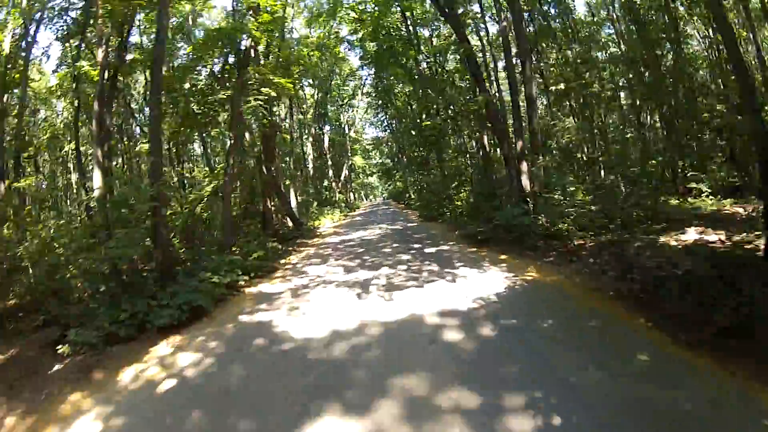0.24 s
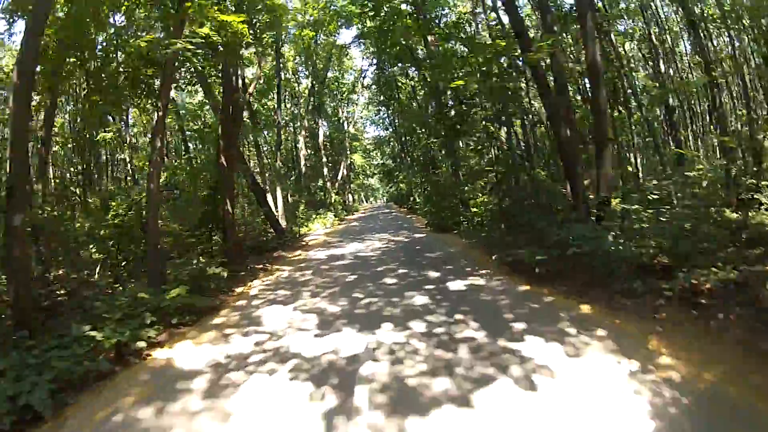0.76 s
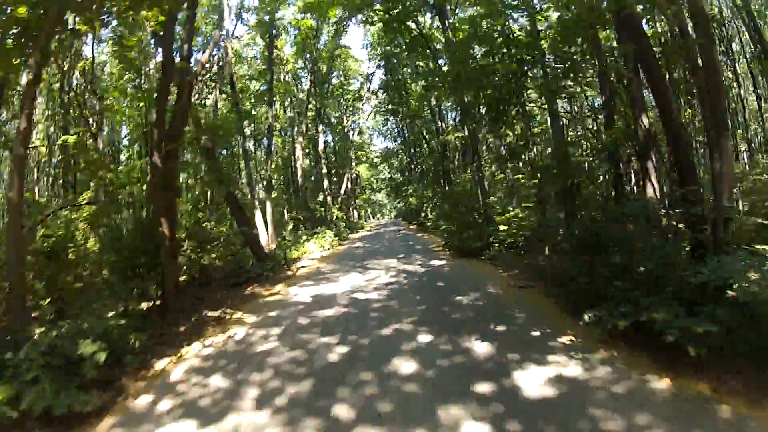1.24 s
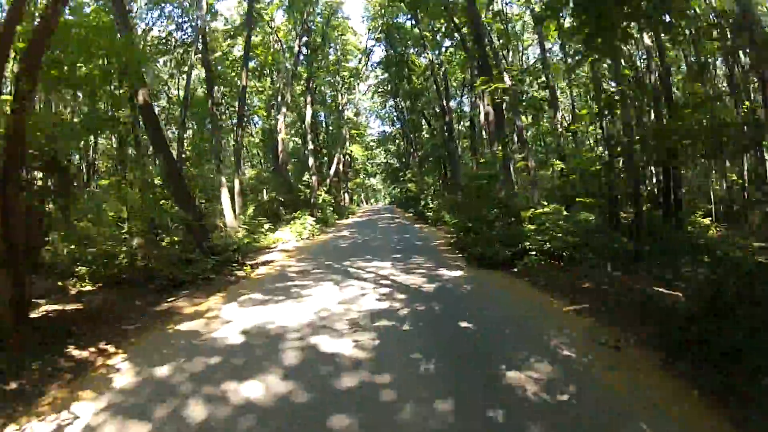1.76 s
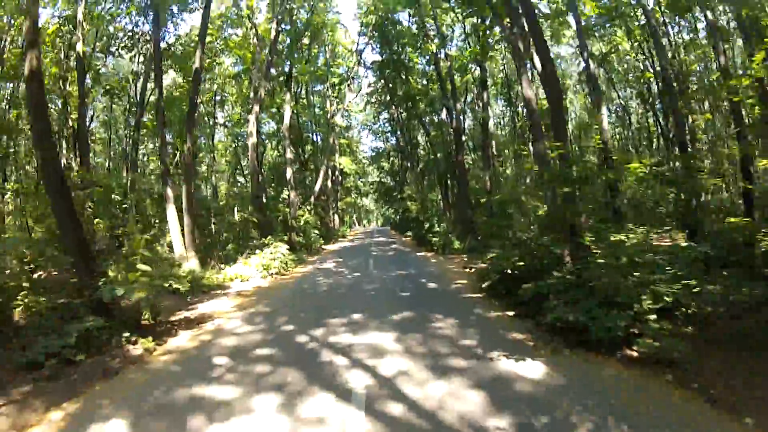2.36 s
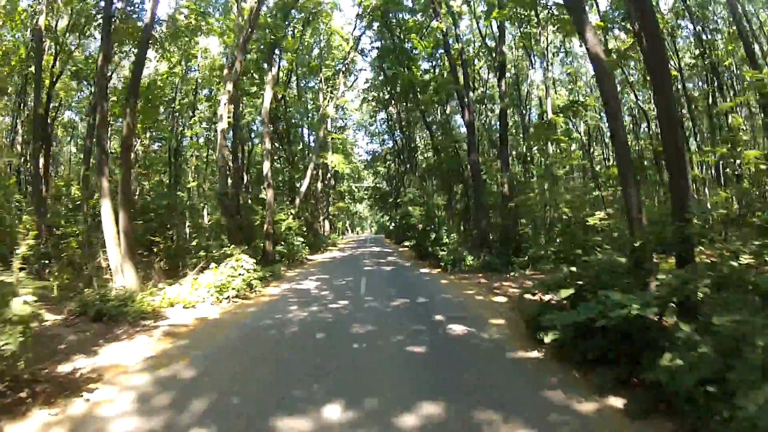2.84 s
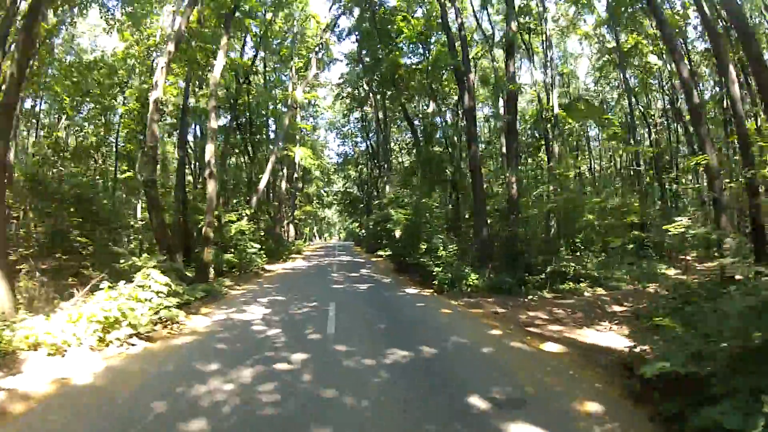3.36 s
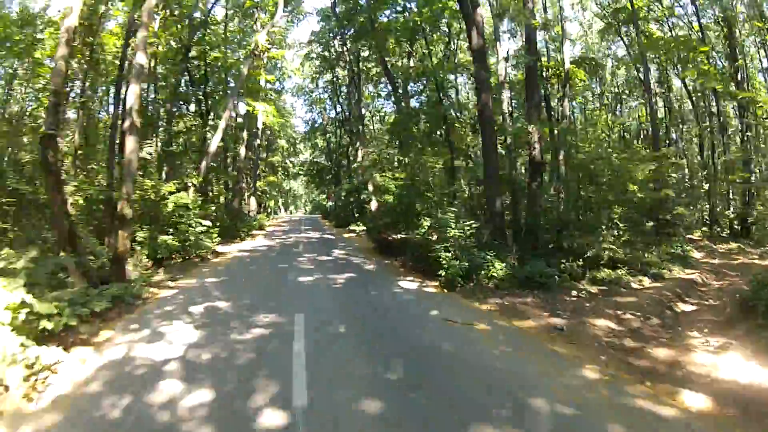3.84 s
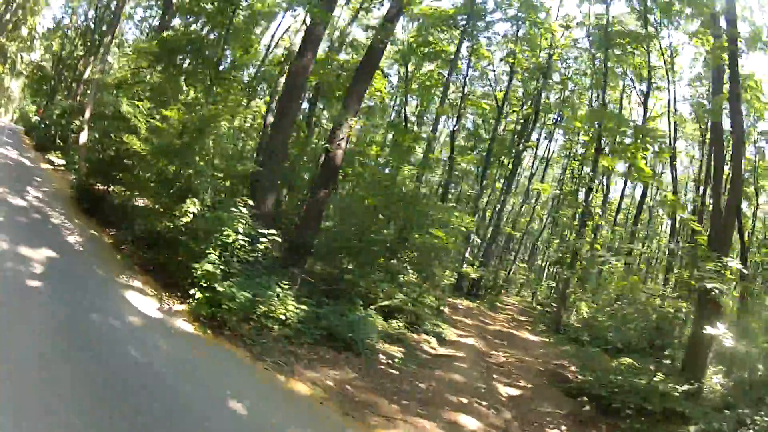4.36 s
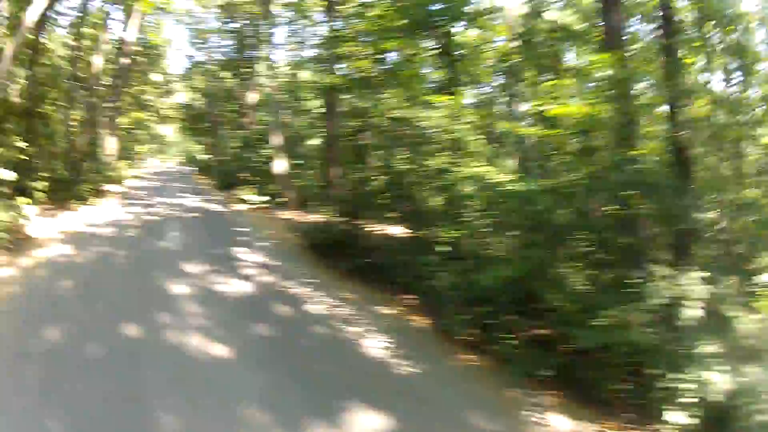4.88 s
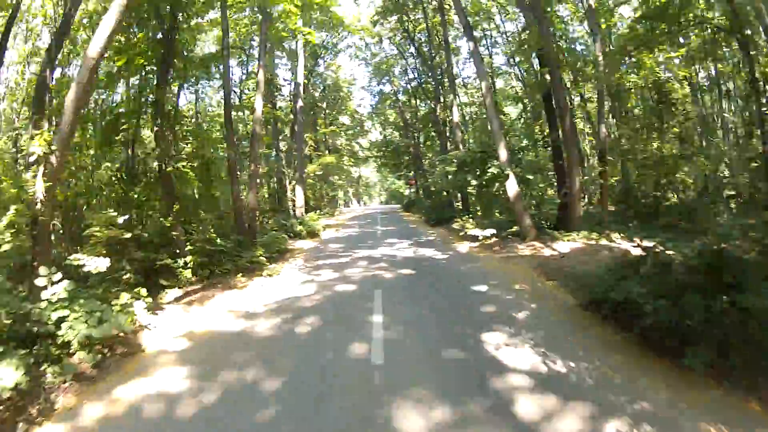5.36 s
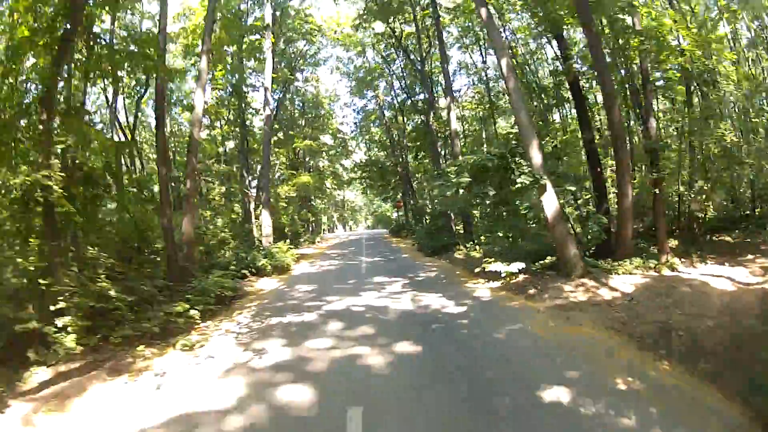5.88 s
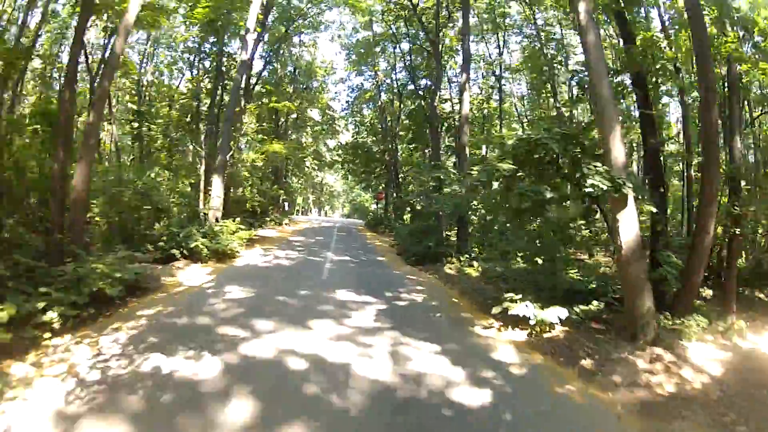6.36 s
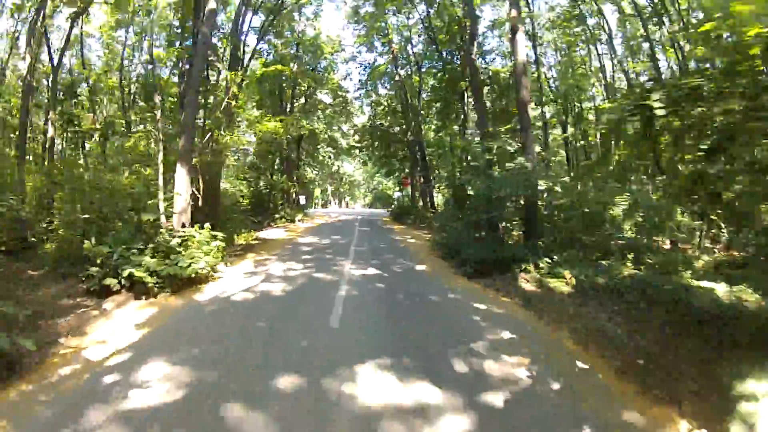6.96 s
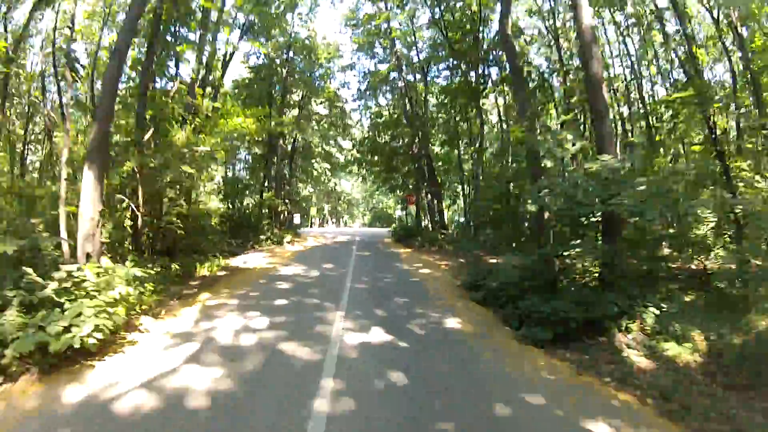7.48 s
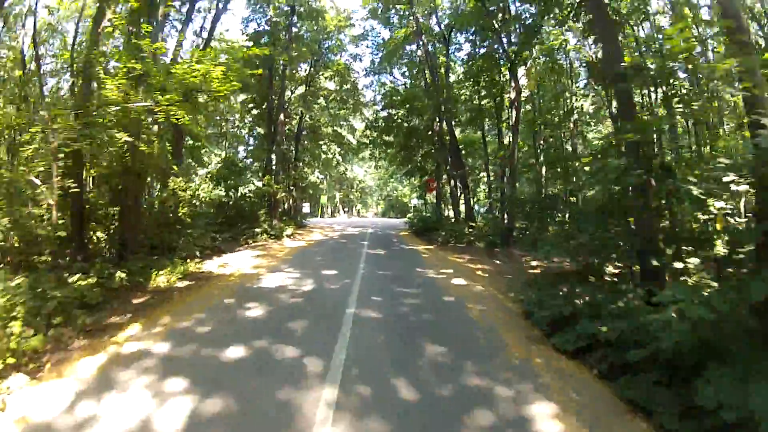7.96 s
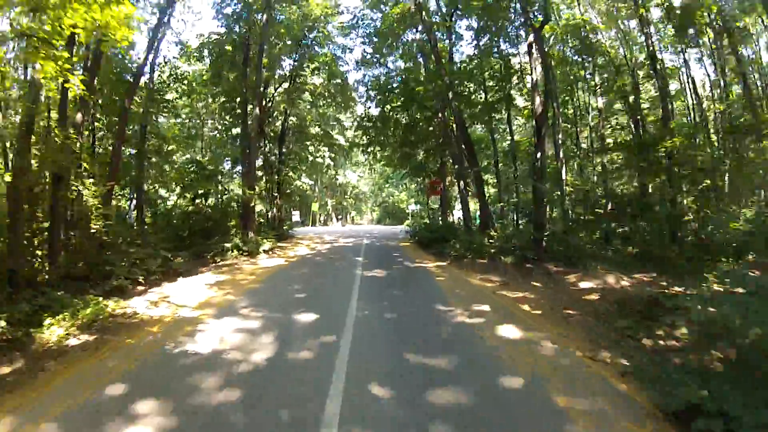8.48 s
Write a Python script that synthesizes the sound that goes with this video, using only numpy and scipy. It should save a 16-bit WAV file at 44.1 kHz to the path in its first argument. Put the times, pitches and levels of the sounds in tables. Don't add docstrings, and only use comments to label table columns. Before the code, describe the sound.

Close, boxy wind noise from a microphone sealed inside a plastic case on a cyclist's helmet. From 0 s a breathy, noisy whistle around 2-3 kHz flutters and swells, strong at 0.4-0.8 s and 2.4-2.9 s, over hollow rushing and irregular low thumps, heaviest at about 1.7, 2.9 and 3.6 s. Tyres hum and roar steadily on asphalt below, slightly rougher near 3.3 and 6.8 s. Faint falling chips and five quick bird phrases come in the first 1.8 s; clear chirps follow at 2.3 s, with a grit tick at 2.45 s. From 4 to 5 s the head turns aside: whistle and rush sink, leaving tyres, soft buffeting and a tick at 4.87 s. Wind returns with puffs at 5.0, 6.0 and strongest 6.7 s. Gusts and thuds continue to 8.7 s, with short bird whistles from 7.1 s, clearest at 7.7 s. A coarse, metallic, lo-fi edge colours the top.

```python
import sys
import numpy as np
from scipy import signal
from scipy.fft import rfft, irfft
from scipy.io import wavfile
from scipy.ndimage import uniform_filter1d

SR = 44100
rng = np.random.default_rng(int(sys.argv[2]) if len(sys.argv) > 2 else 0)


def waveform_to_disk(signal):
    frames = np.transpose(np.atleast_2d(signal))
    scaled = np.clip(frames, -1, 1) * 32767
    samples = np.round(scaled).astype(np.int16)
    wavfile.write(sys.argv[1], SR, samples)


def invert_db(x):
    u = np.asarray(x, float) / 20
    return 10 ** u


N = 384552

CHIP_START_S, CHIP_EVERY_S, CHIPS = 0.239, 0.132, 5
CHIP_DB, CHIP_GROWS_DB = -65, 0.4
# start in seconds, top in Hz, level in dB.
PHRASES = [
    (0.897, 4000, -55),
    (1.092, 3950, -52),
    (1.272, 4400, -53),
    (1.455, 4450, -55),
    (1.643, 4420, -54),
]
# start in seconds, length in seconds, first pitch in Hz, last pitch in Hz, level in dB.
WHISTLES = [(2.267, 0.054, 2850, 3360, -45.5), (2.311, .036, 3530, 3950, -48),
            (2.888, 0.044, 3490, 3450, -55), (3.092, .035, 4550, 4130, -64), (3.122, .035, 4150, 4100, -64),
            (3.238, 0.061, 3260, 3260, -61), (3.35, .02, 4150, 4100, -62), (7.128, .19, 1394, 1420, -51),
            (7.61, .08, 4440, 4320, -68), (7.8, 0.057, 4330, 4360, -70), (7.68, .04, 1870, 1900, -52),
            (7.712, .04, 2080, 2250, -40), (7.742, 0.052, 2190, 2044, -44),
            (7.984, 0.04, 3820, 3580, -53.5), (7.997, 0.018, 4120, 4200, -56),
            (8.022, .06, 1390, 1385, -53), (8.052, .035, 3750, 3450, -61), (8.107, 0.043, 1380, 1405, -46),
            (8.17, 0.052, 1400, 1370, -49), (8.294, 0.04, 3670, 3520, -56), (8.362, 0.03, 3450, 3100, -58),
            (8.548, 0.045, 3800, 2880, -58)]
# start in seconds, length in seconds, first pitch in Hz, last pitch in Hz, level in dB.
BUZZES = [(0.83, .06, 5100, 4970, -67), (1.252, .03, 4200, 4070, -62), (1.367, 0.011, 3900, 3730, -59),
          (2.255, .05, 3740, 3590, -64), (2.36, .04, 3740, 3740, -65), (2.45, .02, 3990, 3900, -48),
          (2.77, .04, 4190, 4200, -59), (3.373, .11, 3880, 3970, -64), (3.644, 0.052, 4500, 4450, -66),
          (5.529, 0.16, 4000, 4100, -64.5), (7.234, .25, 4050, 4010, -63.5), (7.31, 0.095, 3930, 3820, -65)]
CLEAR, BUZZY = 0.12, 0.42

# frequency in Hz, density in dB per Hz.
ROAD_SPECTRUM = [(41, -32), (70, -5.5), (93, -13), (222, -12), (294, -17), (396, -18), (543, -23.5),
                 (1040, -20.5), (1140, -17.5), (1480, -67), (1720, -24.5), (2600, -23.5), (3130, -56),
                 (3700, -54), (6000, -40.5), (7800, -78), (13200, -120)]
# frequency in Hz, width in Hz, level in dB.
TYRE_MODES = [(58.7, 21, 2), (192, 45, 0), (217, 63, -6)]
# middle in seconds, half length in seconds, level in dB.
PATCHES = [
    (3.3, 0.64, 1.5),
    (4.75, .2, 1),
    (5.4, .5, -0.5),
    (6.75, 0.46, 1.5),
]
HUM_DB, HUM_FADE_DB_PER_S, HUM_SHADED_DB = -55.5, 0.14, 3

# start in seconds, ring in Hz, width in Hz, peak in dB.
TICKS = [
    (4.867, 5500, 2600, -48),
    (4.869, 4750, 900, -51),
    (2.454, 4900, 2000, -45),
    (2.43, 5500, 1500, -54),
    (7.447, 3100, 900, -52),
    (5.019, 2300, 700, -37),
    (5.978, 2480, 600, -35),
    (6.68, 2500, 480, -29),
]

# frequency in Hz, width in Hz, level in dB.
CAVITY_MODES = [(2143, 137, 1), (2330, 238, -1.5), (2478, 112, 2.5), (2604, 137, 1.5), (2877, 139, -4.5)]
# frequency in Hz, width in Hz, level in dB.
WALL_MODES = [(755.5, 116, -4.5), (902, 112, -4.5), (967, 140, -12), (1219, 84, 0.5), (1350, 114, 2),
              (1624, 335, -3.5), (1852, 132, -0.5)]
# frequency in Hz, width in Hz, level in dB.
SHELL_MODES = [(3320, 320, -1.5), (3770, 320, -1.5), (3984, 320, -4), (4470, 170, -10.5), (4966, 600, -6),
               (5810, 280, -12)]
# frequency in Hz, density in dB per Hz.
BUFFET_SPECTRUM = [(4.7, -13), (8.0, 9), (21, -1.5), (59, -5), (95, -20.5), (140, -48), (240, -120)]
# time in seconds, level in dB.
FACING = [(0.0, -44.5), (0.4, -37), (0.75, -37.5), (1.0, -42), (1.75, -42.5), (2.4, -38.5), (2.88, -40),
          (3.2, -49), (3.75, -42), (3.93, -44.5), (4.02, -54), (4.45, -60), (4.96, -57), (5.3, -43.5),
          (5.95, -44), (6.35, -40.5), (6.85, -45.5), (7.15, -43)]
# middle in seconds, half length in seconds, level in dB.
GUSTS = [(0.21, 0.077, 3), (0.29, 0.083, -4), (0.55, 0.16, -2.5), (0.82, 0.063, -8), (1.14, .1, 0),
         (1.25, 0.047, 4), (1.42, 0.098, -4.5), (1.57, 0.053, 3), (1.77, 0.051, -3.5), (1.89, 0.14, 2),
         (2.655, 0.054, -9), (3.25, 0.037, -1), (3.35, 0.075, 2), (4.5, .06, -2), (5.04, 0.089, 3),
         (5.33, 0.055, 1), (5.4, 0.032, -7.5), (5.87, .12, -7), (6.08, 0.063, -7.5), (6.46, 0.031, 4.5),
         (6.7, 0.17, -1), (6.95, 0.069, 0), (7.1, 0.059, 4.5), (7.32, 0.038, 5.5), (7.5, 0.082, -4),
         (7.76, 0.037, 2), (7.88, 0.082, -0.5), (8.45, 0.057, -3.5), (8.54, .12, 1.5), (8.7, .12, -2)]
# time in seconds, level in dB.
RIM = [(0.0, -70.5), (0.3, -67.5), (1.2, -67), (2.3, -69), (3.25, -73.5), (3.85, -73), (4.45, -79),
       (4.85, -78.5), (5.4, -72), (6.2, -73), (6.7, -76), (7.85, -72), (8.72, -73.5)]
# time in seconds, share of the turn 0-1.
GLANCE = [
    (3.65, 0),
    (4.0, 0.45),
    (4.35, 1),
    (4.9, 0.84),
    (5.08, 0.3),
    (5.35, 0.1),
]
RUSH_DB, RUSH_FADE_DB_PER_S, RUSH_SHADED_DB = -47.5, 0.3, 9
# middle in seconds, half length in seconds, level in dB over the lull.
THUMPS = [(0.06, .1, -1), (0.24, 0.077, 8), (0.52, 0.19, 12), (0.72, .15, 7), (1.38, 0.13, 12),
          (1.66, 0.16, 18), (1.96, 0.18, 11), (2.19, .2, 13), (2.56, 0.11, 9), (2.73, 0.19, 14),
          (2.89, 0.15, 17.5), (3.25, 0.071, 7), (3.46, 0.1, 11), (3.64, 0.15, 16), (4.07, 0.34, 5),
          (4.45, .1, 6), (4.7, 0.25, 4.5), (5.03, 0.095, 13), (5.33, 0.23, 8), (5.62, .3, 8),
          (5.87, 0.11, 11), (6.1, 0.22, 8.5), (6.36, 0.075, 8), (6.52, 0.07, 4), (6.68, 0.33, 6),
          (7.15, 0.32, 11), (7.5, 0.17, 10), (7.68, 0.17, 16), (7.97, .15, 12.5), (8.28, 0.32, 14)]
LULL_DB, THUMP_SHARE = -53, 0.74
# time in seconds, peak in dB, push +1 or pull -1.
JOLTS = [(0.23, -36, 1), (0.527, -33.5, 1), (0.676, -37, -1), (1.377, -34.5, 1), (1.602, -34, -1),
         (1.699, -31, -1), (1.85, -42, -1), (1.95, -36, 1), (2.198, -32.5, -1), (2.29, -40, 1),
         (2.556, -36, -1), (2.746, -33, -1), (2.878, -29, 1), (3.414, -39, 1), (3.53, -38, -1),
         (3.639, -35, 1), (4.067, -37, 1), (4.209, -41, 1), (4.513, -43, -1), (5.293, -36, -1),
         (5.389, -37, -1), (5.87, -33.5, 1), (6.221, -37, 1), (6.358, -37, -1), (7.057, -36, -1),
         (7.16, -35, -1), (7.49, -33, 1), (7.653, -37, 1), (8.242, -35, 1), (8.382, -37, -1)]
JOLT_S, REBOUND_S, JOLT_DB = 0.0046, 0.032, 0.5
HUSH_S, HUSH_DB = 0.025, -14

CONVERTER_HZ, HOLD = 12000, 4


def rms_one(x):
    return x / np.sqrt(np.mean(x ** 2) + 1e-20)


def in_time(rows):
    s, *columns = np.transpose(rows)
    return [np.interp(np.arange(N) / SR, s, c) for c in columns]


def swells(rows):
    out, t = np.zeros(N), np.arange(N) / SR
    for s, length, level_db in rows:
        span = slice(max(round((s - length) * SR), 0), round((s + length) * SR))
        phase = np.clip((t[span] - s) / length, -1, 1)
        out[span] += level_db * np.cos(np.pi / 2 * phase) ** 2
    return out


def fading(start_db, db_per_s, shaded_db):
    return start_db - db_per_s * np.arange(N) / SR - shaded_db * in_time(GLANCE)[0]


def drift(rate):
    r = np.exp(-40 * np.pi * rate / SR)
    noise = rng.standard_normal(N // 20 + 2002)
    slow = signal.lfilter([1], [1, -2 * r, r * r], noise)[2000:]
    return np.interp(np.arange(N) / 20, np.arange(len(slow)), rms_one(slow))


def puffs(per_s, die_s):
    hits = (rng.random(N) < per_s / SR) * np.minimum(rng.exponential(1, N), 2.5)
    level = signal.lfilter([1], [1, -np.exp(-1 / (die_s * SR))], hits)
    level = uniform_filter1d(level, size=80)
    return rms_one(level - level.mean())


def coloured(spectrum):
    hz = np.arange(N // 2 + 1) * SR / N + 1
    corner_hz, corner_db = np.transpose(spectrum)
    level_db = np.interp(np.log(hz), np.log(corner_hz), corner_db)
    return rms_one(irfft(rfft(rng.standard_normal(N)) * invert_db(level_db), N))


def evened(x, window_s):
    power = uniform_filter1d(x ** 2, size=round(window_s * SR))
    return rms_one(x / np.sqrt(power + 0.1))


def resonate(x, hz, width_hz):
    r = np.exp(-np.pi * width_hz / SR)
    section = [(1 - r * r) / 2, 0, (r * r - 1) / 2, 1, -2 * r * np.cos(2 * np.pi * hz / SR), r * r]
    return signal.sosfilt([section, section], x)


def blown(modes, eddies, shared_db, own_db, own_rate):
    out = 0
    for hz, width_hz, level_db in modes:
        push = rng.standard_normal(N) * invert_db(shared_db * eddies + own_db * drift(own_rate))
        out = out + invert_db(level_db) * resonate(push, hz, 1.48 * width_hz)
    return rms_one(out)


def scatter(x, start_s, t60):
    age = np.arange(round(0.4 * SR)) / SR
    echoes = rng.standard_normal(len(age)) * invert_db(-60 * age / t60) * (age > start_s)
    return signal.fftconvolve(x, echoes / np.sqrt(np.sum(echoes ** 2)))[:N]


def songs():
    notes = []
    for k in range(CHIPS):
        s, level_db = CHIP_START_S + k * CHIP_EVERY_S, CHIP_DB + k * CHIP_GROWS_DB
        notes.append((s, 0.04, 6000, 5000, level_db, 0.3))
        notes.append((s + 0.04, 0.04, 5150, 5050, level_db - 1.5, 0.4))
    for s, top_hz, level_db in PHRASES:
        notes.append((s, 0.017, 3750, top_hz - 200, level_db + 1.5, 0.25))
        notes.append((s + 0.025, 0.045, top_hz, 3000, level_db - 1.0, 0.25))
        notes.append((s + 0.064, 0.035, 3050, 3100, level_db + 4.5, 0.45))
    return notes + [(*row, CLEAR) for row in WHISTLES] + [(*row, BUZZY) for row in BUZZES]


def birds():
    out, waver, flutter = np.zeros(N), drift(320), drift(200)
    for s, length, first_hz, last_hz, level_db, buzz in songs():
        span = slice(round(s * SR), round((s + length) * SR))
        along = np.linspace(0, 1, span.stop - span.start)
        hz = first_hz + (last_hz - first_hz) * along ** 1.5 + 260 * buzz * waver[span]
        note_db = level_db + 1 + buzz * (4 + 5 * flutter[span])
        swell = np.sin(np.pi * along) ** 0.5 * invert_db(note_db)
        out[span] += swell * np.sin(2 * np.pi * np.cumsum(hz) / SR)
    leaves = invert_db(-6) * scatter(out, 0.002, 0.1)
    trunks = invert_db(-4.5) * scatter(out, 0.033, 0.77)
    return out + leaves + trunks


def road():
    hum = blown(TYRE_MODES, 0, shared_db=0, own_db=0.8, own_rate=2.8)
    level_db = fading(HUM_DB, HUM_FADE_DB_PER_S, HUM_SHADED_DB) + swells(PATCHES)
    return invert_db(level_db) * (invert_db(3.5) * coloured(ROAD_SPECTRUM) + invert_db(-3) * hum)


def grit():
    out = np.zeros(N)
    age = np.arange(round(0.02 * SR)) / SR
    for s, hz, width_hz, peak_db in TICKS:
        puff = rng.standard_normal(len(age)) * invert_db(-60 * age / 0.0134)
        burst = resonate(resonate(puff, hz, width_hz), hz, width_hz)
        start = round(s * SR)
        out[start:start + len(age)] += invert_db(peak_db) * burst / np.abs(burst).max()
    return out


def jolts():
    s, peak_db, way = np.transpose(JOLTS)
    hits = np.zeros(N)
    hits[(s * SR).astype(int)] = invert_db(peak_db + JOLT_DB) * np.sign(way)
    age = np.arange(-0.1, 0.1, 1 / SR)
    bump = np.exp(-0.5 * (age / JOLT_S) ** 2)
    slack = np.exp(-0.5 * (age / REBOUND_S) ** 2)
    shape = bump - slack * bump.sum() / slack.sum()
    return signal.fftconvolve(hits, shape / shape.max(), mode="same")


def buffeting():
    level_db = LULL_DB + THUMP_SHARE * swells(THUMPS) + 2 * drift(11)
    hush_db = swells([(s, HUSH_S, HUSH_DB) for s, *_ in JOLTS])
    return invert_db(level_db + hush_db) * evened(coloured(BUFFET_SPECTRUM), 0.12)


def wind():
    gust_db = swells(GUSTS)
    eddies = 0.64 * drift(22.6) + 0.5 * puffs(70, 0.0031)
    whistle_db = in_time(FACING)[0] + gust_db
    whistle = invert_db(whistle_db) * blown(CAVITY_MODES, eddies, shared_db=2.0, own_db=0.0, own_rate=25)
    rush_db = fading(RUSH_DB, RUSH_FADE_DB_PER_S, RUSH_SHADED_DB) + 0.11 * gust_db + 0.5
    rush = invert_db(rush_db) * blown(WALL_MODES, eddies, shared_db=0.03, own_db=1.5, own_rate=4.3)
    hiss_db = in_time(RIM)[0] + 0.19 * gust_db + 8.5
    hiss = invert_db(hiss_db) * blown(SHELL_MODES, eddies, shared_db=1.0, own_db=1.5, own_rate=6.1)
    return whistle + rush + hiss + buffeting() + jolts()


def scene():
    return (birds() + road() + grit() + wind())[None]


def band_limit(x):
    return signal.sosfilt(signal.butter(12, 15300, fs=SR, output="sos"), x)


def record(dry):
    common = np.gcd(SR, CONVERTER_HZ)
    slow = signal.resample_poly(dry, CONVERTER_HZ // common, SR // common, axis=1)
    held = np.repeat(slow, HOLD, axis=1)
    back = signal.resample_poly(held, SR // common, HOLD * CONVERTER_HZ // common, axis=1)[:, :N]
    return band_limit(back)


dry = scene()
out = record(dry)
waveform_to_disk(out)
```